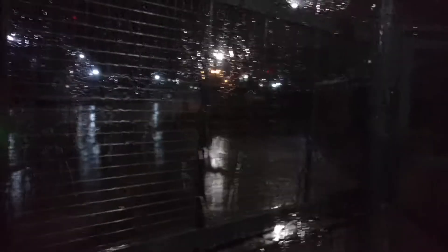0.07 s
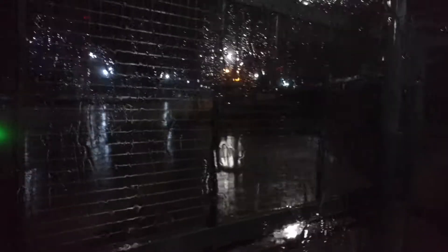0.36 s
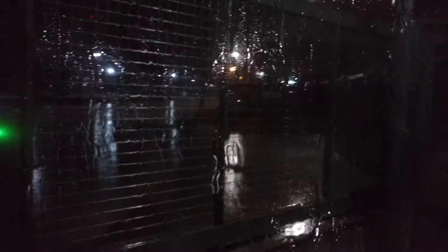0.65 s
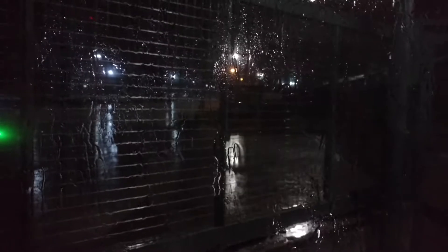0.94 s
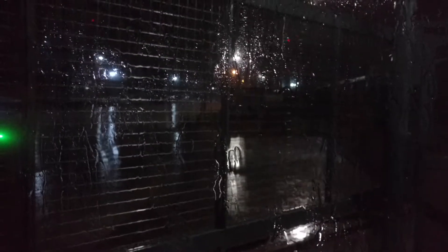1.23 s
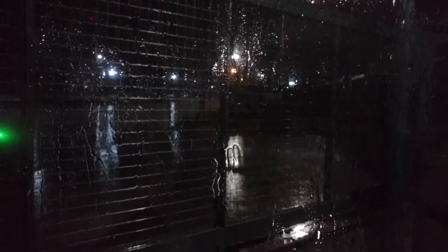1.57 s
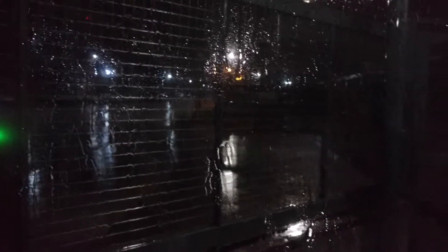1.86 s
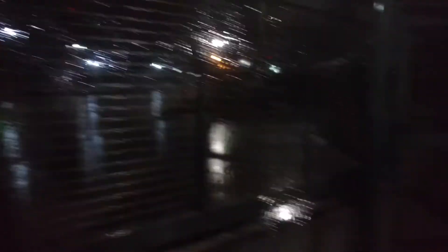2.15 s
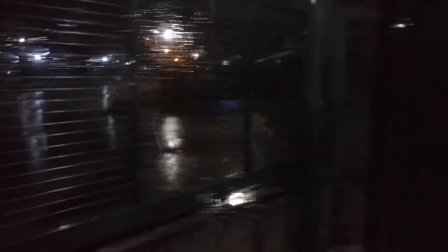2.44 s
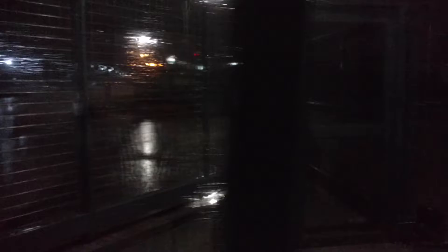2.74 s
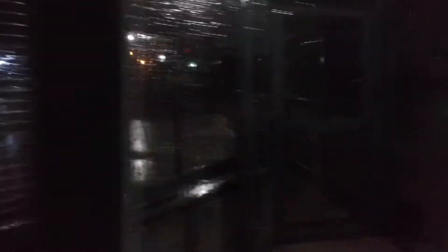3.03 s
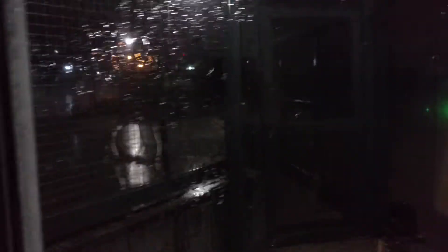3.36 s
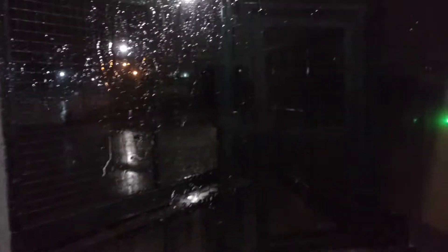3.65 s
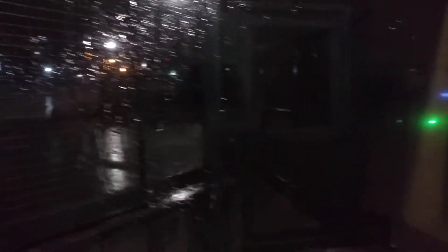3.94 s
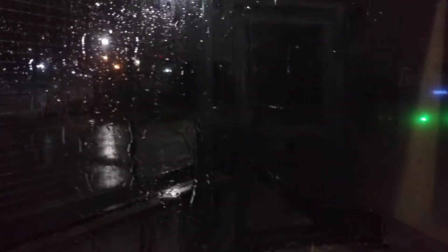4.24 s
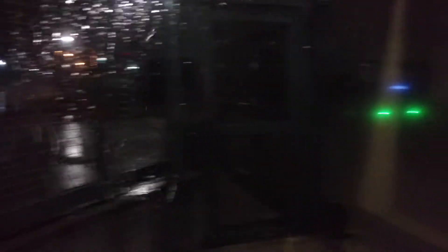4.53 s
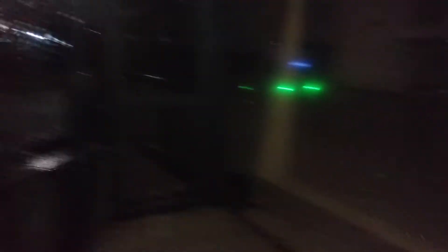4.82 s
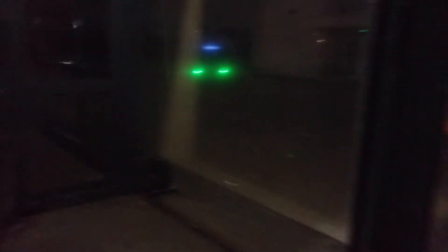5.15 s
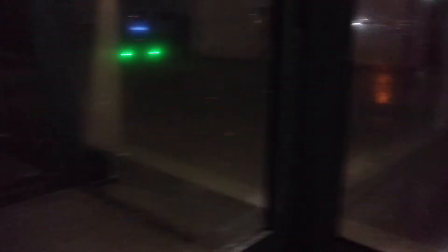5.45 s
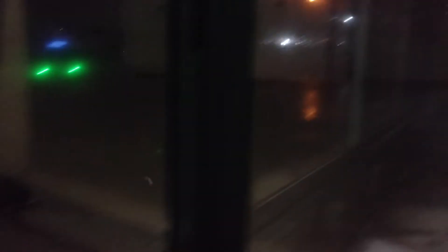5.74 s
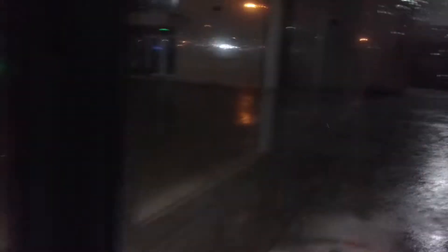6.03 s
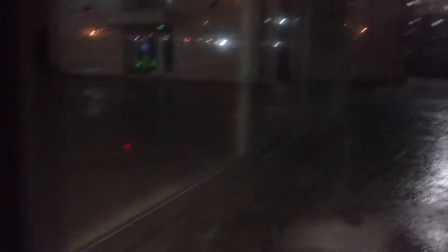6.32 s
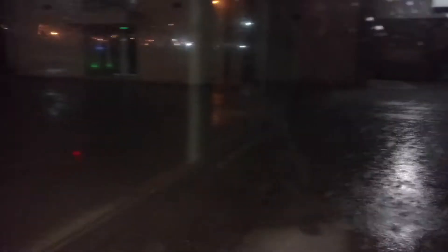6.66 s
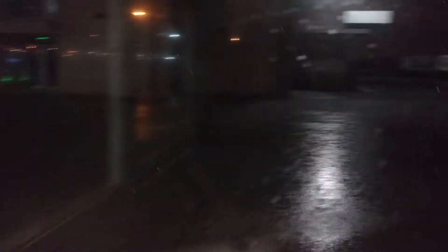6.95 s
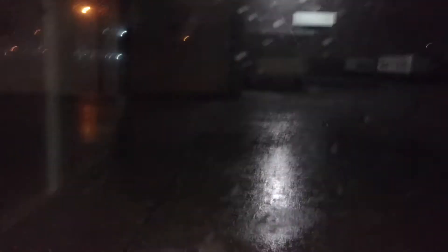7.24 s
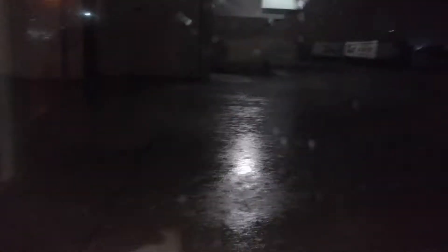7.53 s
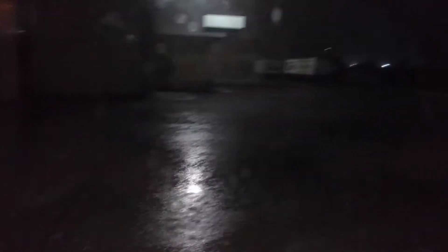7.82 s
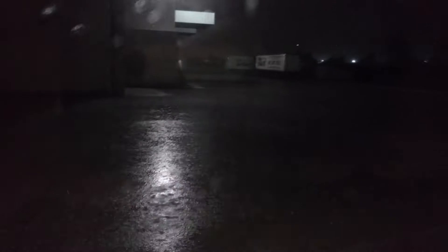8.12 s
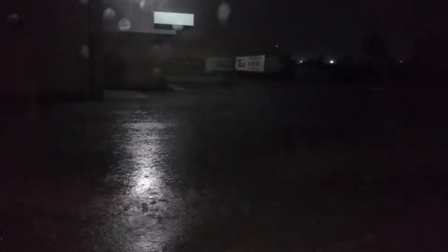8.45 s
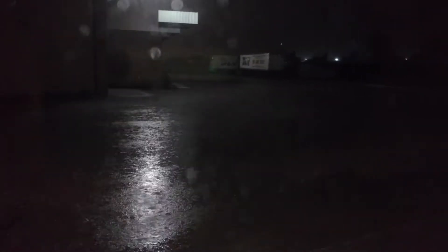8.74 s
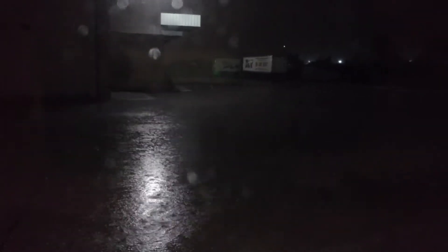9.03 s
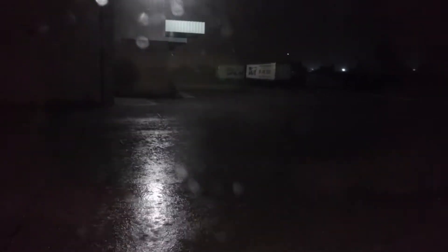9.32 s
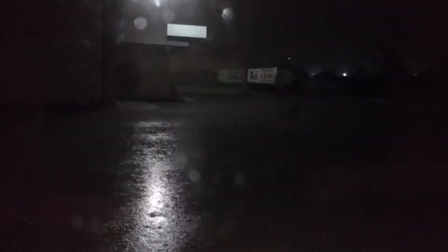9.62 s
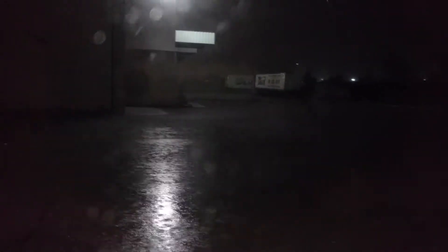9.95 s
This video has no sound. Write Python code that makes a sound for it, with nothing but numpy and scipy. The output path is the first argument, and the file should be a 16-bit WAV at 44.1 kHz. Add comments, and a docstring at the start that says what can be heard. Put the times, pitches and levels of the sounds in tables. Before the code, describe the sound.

From inside a glass entrance, a night storm starts with moderate wind, pattering rain, irregular splats and sharp ticks near the microphone. Stronger gusts then buffet the building with a deep rumble and surges of hiss, and a motor hums faintly for a moment. Dull knocks from the frame follow, along with a rising hollow roar and short, soft howls. After the hardest water hits, the whole sound dips and slowly swells back.

```python
"""Wind roars round a building and drives sheets of rain: a night storm from just inside a glazed entrance.
Blown water slaps on glass and ground, and hard drops tick close to the microphone. A machine hums faintly
as the microphone is carried past it; later the frame knocks and gusts howl briefly across a gap.
The hardest hits make the recorder turn its gain down, and the storm swells back slowly after each."""
import sys
import numpy as np
from scipy import signal
from scipy.fft import rfft, irfft, next_fast_len
from scipy.io import wavfile
from scipy.ndimage import uniform_filter1d, map_coordinates

SR = 44100
rng = np.random.default_rng(int(sys.argv[2]) if len(sys.argv) > 2 else 0)


def unload_audio(sound):
    """Save the sound as a 16-bit wav file, at the path given as the first command line argument."""
    columns = np.transpose(np.atleast_2d(sound))
    # keep every value between -1 and 1, then stretch to whole-number steps
    steps = np.round(np.clip(columns, -1, 1) * 32767)
    wavfile.write(sys.argv[1], SR, steps.astype(np.int16))


N = 440118
TIME = np.arange(N) / SR
FFT_SIZE = next_fast_len(N + 4096)
HZ = np.maximum(np.arange(FFT_SIZE // 2 + 1) * SR / FFT_SIZE, 1)


def from_db(db):
    """Decibels to gain."""
    return 10 ** (np.asarray(db) / 20)


def unit_rms(x):
    """Scale to unit rms."""
    return x / np.sqrt(np.mean(x ** 2) + 1e-20)


def in_time(rows):
    """A curve's value at every sample."""
    return np.interp(TIME, *np.transpose(rows))


def in_hz(rows):
    """Each column of a spectrum at every frequency."""
    hz, *columns = np.transpose(rows)
    return [np.interp(np.log(HZ), np.log(hz), column) for column in columns]


def drift(per_s):
    """A random wander of unit rms that turns about per_s times a second."""
    knots = rng.standard_normal(N // 10)
    return unit_rms(np.interp(TIME * per_s, np.arange(len(knots)), knots))


def swells(rows):
    """Sum of passing swells, each a bell in time."""
    return sum(height * np.exp(-((TIME - peak_s) / half_s) ** 2) for peak_s, half_s, height in rows)


def band(x, low_hz, high_hz, order=2):
    """Causal band-pass."""
    sos = signal.butter(order, [low_hz, min(high_hz, .45 * SR)], "band", fs=SR, output="sos")
    return signal.sosfilt(sos, x)


def noise(spectrum):
    """Two unrelated noises of the given colour."""
    white = rfft(rng.standard_normal((2, FFT_SIZE)))
    return unit_rms(irfft(white * from_db(in_hz(spectrum)[0]))[:, :N])


def patchy(x, depth_db, per_octave, per_s):
    """Broad resonances come and go at random, the same in both channels."""
    hz, time_s, cells = signal.stft(x, SR, nperseg=1024)
    grid = np.meshgrid(np.log2(1 + hz / 100) * per_octave, time_s * per_s, indexing="ij")
    hills = unit_rms(map_coordinates(rng.standard_normal((256, 512)), grid, order=1, mode="wrap"))
    return unit_rms(signal.istft(cells * from_db(depth_db * hills), SR)[1][:, :N])


def patter(per_s, spread_db, t60_s):
    """Envelope of many small splashes of uneven size, each dying quickly."""
    lands = rng.random(N) < per_s / SR
    sizes = from_db(spread_db * np.minimum(rng.exponential(1, N), 4))
    power_decay = from_db(-60 / (t60_s * SR)) ** 2
    return unit_rms(np.sqrt(signal.lfilter([1], [1, -power_decay], lands * sizes ** 2 + 1e-18)))


def impact(start_s, rise_s, t60_s, hold_s=0):
    """Span and envelope of one hit: a quick rise, perhaps a short hold, then an even decay."""
    start = round(start_s * SR)
    age_s = np.arange(min(SR // 2, N - start)) / SR
    decay = from_db(-60 * np.maximum(age_s - rise_s - hold_s, 0) / t60_s)
    return slice(start, start + len(age_s)), np.minimum(age_s / rise_s, 1) * decay


def wind(strength_db, rumble_follows=0.62):
    """The building rumbles under each gust; shifting eddies give the roar a hollow, uneven colour."""
    # colours of the building's rumble, the roar outside and the hollow entrance: frequency_hz, relative_db
    rumble_colour = [(45, -20), (70, 2), (99, 13), (112, 5.5), (127, 8.5), (145, 5), (270, -24.5)]
    roar_colour = [(100, -15), (180, -4.5), (280, 0.5), (450, -1), (700, 1), (1600, -3.5), (2400, -6.5),
                   (4500, -33.5)]
    hollow_colour = [(90, -16), (280, 1), (450, -0.5), (820, -2), (1080, -12), (3000, -27)]
    # gusts that buffet the building: peak_s, half_length_s, extra_rumble_db
    buffets = [(2.73, 0.12, 9), (3.56, 0.26, 11), (4.75, 0.56, 7), (9.5, 0.64, 4)]
    # hollow roar that swells round the entrance later on: time_s, level_db
    hollow_rise = [(6.1, -62), (6.55, -45), (7.15, -42.5), (7.75, -37), (9.1, -33.5), (9.4, -35.5),
                   (9.98, -28.5)]
    rumble = noise(rumble_colour)
    rumble *= from_db(-54 + rumble_follows * strength_db + swells(buffets) + 1.2 * drift(22))
    roar = patchy(noise(roar_colour), depth_db=2.5, per_octave=5.854, per_s=14)
    roar *= from_db(-36.5 + strength_db + 0.7 * drift(45))
    hollow = patchy(noise(hollow_colour), depth_db=2, per_octave=7, per_s=10)
    hollow *= from_db(in_time(hollow_rise) + 3.4 * drift(20))
    return rumble + roar + hollow


def rain(strength_db, wind_follows=0.84):
    """Far rain merges to a hiss; nearer drops patter out of it and the nearest click."""
    # colour of the rain: frequency_hz, relative_db
    rain_colour = [(900, -10.5), (2200, -7), (3300, 1), (7000, 0.5), (11000, -8.5), (15000, -6.5)]
    # sheets of rain sweeping past the entrance: peak_s, half_length_s, extra_db
    sheets = [(3.4, 0.17, 2), (4.02, 0.098, 7.5), (4.83, 0.16, 8.5), (5.6, 0.42, 5.5), (6.05, 0.087, 9.5),
              (6.8, 0.32, 5), (9.7, 0.096, 4.5)]
    near = from_db(-4.5) * patter(per_s=40, spread_db=-0.5, t60_s=0.15)
    hiss = noise(rain_colour) * np.hypot(from_db(-0.7), near)
    clicks = noise(rain_colour) * from_db(-11) * patter(per_s=41, spread_db=5.5, t60_s=0.013)
    return (hiss + clicks) * from_db(-43 + wind_follows * strength_db + swells(sheets))


def splats():
    """Blown water smacks down, then bursts into droplets whose hiss dies away between hard walls."""
    # water landing on glass and ground: start_s, body_db, slap_db, spray_db
    landings = [(0.173, -39, -36, -40), (0.336, -31, -36, -41), (0.477, -55, -42, -43),
                (0.779, -52, -41.5, -33.5), (0.921, -35, -32.5, -52), (0.976, -32, -33.5, -36.5),
                (1.039, -30.5, -33.5, -47), (1.061, -47, -47, -35), (1.162, -41, -40.5, -55),
                (1.2534, -24, -25.5, -26), (1.473, -28.5, -30, -29), (1.986, -24.5, -30, -40),
                (2.049, -30, -40, -57), (2.437, -34, -37, -49), (2.861, -28.5, -33.5, -34.5),
                (3.054, -36.5, -35.5, -51), (3.116, -38, -40.5, -34.5), (3.886, -15.5, -20, -20.5),
                (4.074, -39, -37, -26), (4.129, -15, -20, -29), (4.466, -26, -30, -31.5),
                (4.904, -27, -32, -30), (4.946, -24.5, -27, -32), (5.095, -30, -28.5, -38),
                (5.163, -27, -53, -49), (5.208, -47, -35.5, -32), (5.303, -21, -26, -26),
                (5.504, -25.5, -28.5, -28.5), (5.966, -27, -22.5, -24), (6.677, -30, -28.5, -28),
                (6.799, -35, -28, -34), (6.872, -31, -28, -25.5), (6.993, -27, -31, -35.5),
                (7.251, -31.5, -43, -45), (7.613, -32, -43, -41), (7.918, -26, -27.5, -45),
                (8.19, -22, -22.5, -22.5), (8.251, -6, -12.5, -27.5), (8.53, -27, -34.5, -31),
                (8.59, -30, -26, -46), (8.726, -42, -32.5, -24), (8.906, -21, -20.5, -28.5),
                (9.42, -43, -35, -38), (9.452, -48, -41, -31), (9.884, -21, -14, -14)]
    # body, slap and spray of a splat: low_hz, high_hz, t60_s
    splat_bands = [(597, 2150, 0.25), (2540, 7150, 0.34), (7800, 15300, 0.29)]
    # every spot that is hit rings with a colour of its own
    droplets = patchy(rng.standard_normal((2, N)), depth_db=3, per_octave=7, per_s=6)
    out = np.zeros((2, N))
    for part, (low_hz, high_hz, t60_s) in enumerate(splat_bands):
        power = np.zeros(N)
        for start_s, *parts_db in landings:
            body_db, _, spray_db = parts_db
            rise_s = 0.0022 * from_db(-0.12 * (spray_db - body_db))  # brighter splats burst sooner
            hold_s = 0.02 * from_db(0.74 * body_db)  # heavier ones take longer to land
            span, burst = impact(start_s, rise_s, t60_s, hold_s)
            smack = from_db(3) * impact(start_s, rise_s=0.00032, t60_s=0.0083)[1]
            power[span] += from_db(parts_db[part]) ** 2 * (burst ** 2 + smack ** 2)
        out += np.sqrt(power) * unit_rms(band(droplets, low_hz, high_hz, order=3))
    return out


def ticks(port_lag_s=0.00042, band_ratio=1.22, room_db=-3, room_t60_s=0.22):
    """A hard drop cracks and the walls answer; the far channel gets it later, weaker and inverted."""
    # drops close to the microphone: start_s, peak_db, centre_hz, t60_s, left_minus_right_db
    drops = [(0.1738, -16.5, 4800, 0.022, -6), (0.225, -15.5, 13000, .012, -6),
             (0.7783, -8.5, 9400, 0.018, -2), (0.9222, -16.5, 3140, 0.039, -2),
             (1.163, -21, 6000, .015, -6), (1.2567, -1, 5760, 0.024, -7), (1.423, -10.5, 4870, 0.017, -5),
             (1.474, -9.5, 6840, 0.044, -5), (1.9871, 2.5, 5600, 0.0059, -4.5),
             (3.7643, -11.5, 4500, 0.021, -2), (3.887, -2, 7100, 0.019, -6), (4.4549, -4, 2980, 0.0079, -8),
             (6.797, -3.5, 8400, 0.0042, -10), (6.8116, -3.5, 3600, 0.02, -3), (6.895, -9, 4000, 0.015, -4),
             (6.972, -7.5, 4530, 0.011, -4), (8.0153, 8.5, 5500, 0.0032, 4), (8.252, 5, 2500, .02, 16),
             (8.592, -3.5, 4500, 0.0091, -4), (9.892, 4, 5700, 0.041, -4)]
    out = np.zeros((2, N))
    for start_s, peak_db, hz, t60_s, pan_db in drops:
        span, envelope = impact(start_s, 1 / SR, t60_s)
        tail = from_db(room_db) * np.sqrt(t60_s / room_t60_s) * impact(start_s, 0.0016, room_t60_s)[1]
        bursts = np.array([envelope, tail, tail]) * rng.standard_normal((3, SR))[:, :len(envelope)]
        crack, near_wall, far_wall = band(bursts, hz / band_ratio, hz * band_ratio, order=1)
        late_crack = np.roll(crack, round(port_lag_s * SR))
        gain = from_db(peak_db) / np.abs(crack).max()
        near = int(pan_db < 0)
        out[near, span] += gain * (crack + near_wall)
        out[1 - near, span] -= gain * from_db(-abs(pan_db)) * (late_crack + far_wall)
    return out


def machine_hum(fade_db_per_s=17):
    """Steady motor tones swell and fade as the microphone moves through the room's standing waves."""
    # motor tones and their loud stretches: pitch_hz, level_db, from_s, until_s
    tones = [(302.7, -49, 3.07, 5.1), (328.3, -46.5, 3.4, 5.15), (415.4, -46, 3.52, 5.62)]
    out = np.zeros(N)
    for pitch_hz, level_db, from_s, until_s in tones:
        away_s = np.abs(TIME - np.clip(TIME, from_s, until_s))
        level = from_db(level_db - fade_db_per_s * away_s + 1.1 * drift(2.97))
        out += level * np.sin(2 * np.pi * pitch_hz * TIME + 0.12 * drift(5.4))
    return np.sqrt(2) * out


def frame_knocks(rise_s=0.0015):
    """The frame bumps in its seat: a dull, heavily damped thud."""
    # bumps of the entrance frame: start_s, level_db, centre_hz, t60_s
    bumps = [(5.966, -13, 680, 0.16), (6.367, -25, 550, 0.17), (6.749, -30, 300, 0.18),
             (7.238, -29, 380, 0.14), (8.462, -22, 730, 0.063)]
    out = np.zeros((2, N))
    for start_s, level_db, hz, t60_s in bumps:
        span, envelope = impact(start_s, rise_s, t60_s)
        thud = unit_rms(band(rng.standard_normal((2, len(envelope))), hz / 2, hz * 2))
        out[:, span] += from_db(level_db) * envelope * thud
    return out


def gap_howl(low_hz=706, high_hz=970):
    """Gusts blow across a gap and briefly sound its broad resonance."""
    # gusts across the gap: peak_s, half_length_s, level_db
    howls = [(7.815, 0.017, -29), (9.357, 0.032, -31), (9.66, 0.16, -35)]
    level = swells((peak_s, half_s, from_db(level_db)) for peak_s, half_s, level_db in howls)
    return level * unit_rms(band(rng.standard_normal((2, N)), low_hz, high_hz))


def microphone(field, quadrature=0.82):
    """Sound from all round reaches two close ports, in step or opposed according to its wavelength."""
    # likeness of the two ports: frequency_hz, coherence, left_lag_rad
    ports = [(59.4, 1, -3), (152, 0.37, -1), (297, 0.74, -1.15), (586, 0.8, -0.93), (1170, 1, 0.5),
             (1733, 0.5, 1.54), (2170, 1, 2.9), (2500, 1, 3.35), (2880, 0.39, 4.5), (3290, 1, 6.5),
             (4860, 0.59, 9.5), (5850, 0.51, 12), (7100, 0.28, 15.5), (18700, 0.029, 39)]
    # microphone response: frequency_hz, gain_db
    response = [(1100, 0), (2600, 5), (4400, 5), (6200, 1.8), (11500, 1.6), (15000, -6.5)]
    # channel balance: frequency_hz, left_minus_right_db
    balance = [(100, -0.5), (450, 1.5), (2350, -1.5), (3600, -2), (8000, -4)]
    left, right = rfft(field, FFT_SIZE)
    coherence, lag_rad = in_hz(ports)
    likeness = np.clip(coherence, 0, .999) * (np.cos(lag_rad) + 1j * quadrature * np.sin(lag_rad))
    common, apart = np.sqrt(1 + abs(likeness)), np.sqrt(1 - abs(likeness))
    own = (common + apart) / 2
    cross = (common - apart) / 2 * np.exp(1j * np.angle(likeness))
    pair = np.array([own * left + cross.conj() * right, own * right + cross * left])
    gain_db = in_hz(response)[0] + in_hz(balance)[0] * [[.5], [-.5]]
    return irfft(pair * from_db(gain_db))[:, :N]


def gain_control(x, limit_db=-6.5, attack_s=0.00031, recovery_db_per_s=13.5):
    """A peak over the limit turns the gain down at once; it creeps back at a steady rate."""
    over_db = np.maximum(20 * np.log10(np.abs(x).max(axis=0) + 1e-9) - limit_db, 0)
    recovered_db = recovery_db_per_s * TIME
    cut_db = np.maximum.accumulate(over_db + recovered_db) - recovered_db
    return x * from_db(-uniform_filter1d(cut_db, round(attack_s * SR)))


def scene():
    """Wind, water and knocks reach the microphone from all round; ticks and hum arrive directly."""
    # strength of the wind about its usual level: time_s, strength_db
    gusts = [(0.0, -7.5), (0.6, -5.5), (1.5, -5), (2.45, -7), (3.1, -2), (3.6, 3), (5.15, 3.5), (5.6, -4),
             (5.9, 2), (6.3, -5), (6.75, 2.5), (7.25, -3.5), (7.82, 3.5), (8.45, 7.5), (8.78, 3), (9.2, -2),
             (9.55, 3.5), (9.98, 4)]
    strength_db = in_time(gusts)
    water = rain(strength_db) + splats()
    field = wind(strength_db) + gap_howl() + water + frame_knocks()
    return microphone(field) + ticks() + machine_hum()


def record(dry):
    """The recorder ducks under hard hits, clips at full scale and cuts the top above 15.8 kHz."""
    low_pass = signal.ellip(10, .1, 80, 15800, fs=SR, output="sos")
    return signal.sosfilt(low_pass, np.clip(gain_control(dry), -1, 1))


dry = scene()
out = record(dry)
unload_audio(out)
```